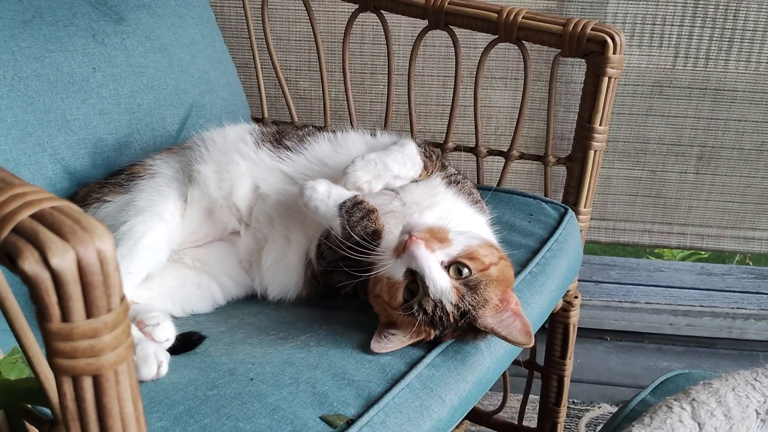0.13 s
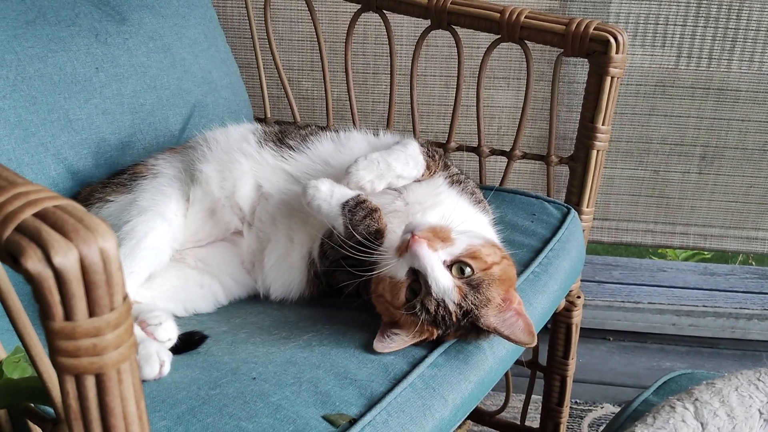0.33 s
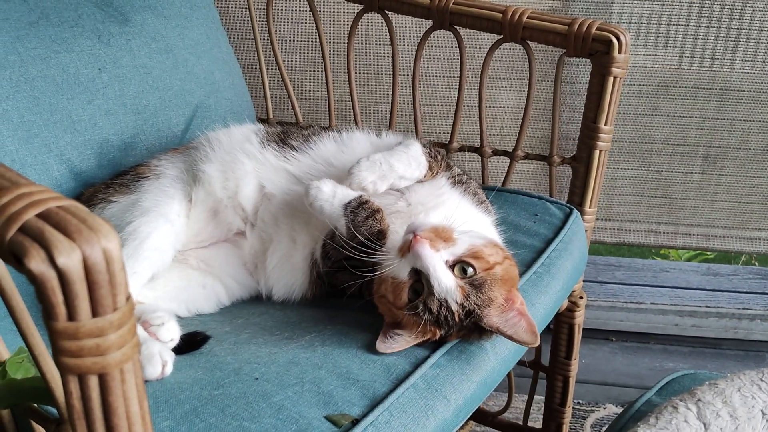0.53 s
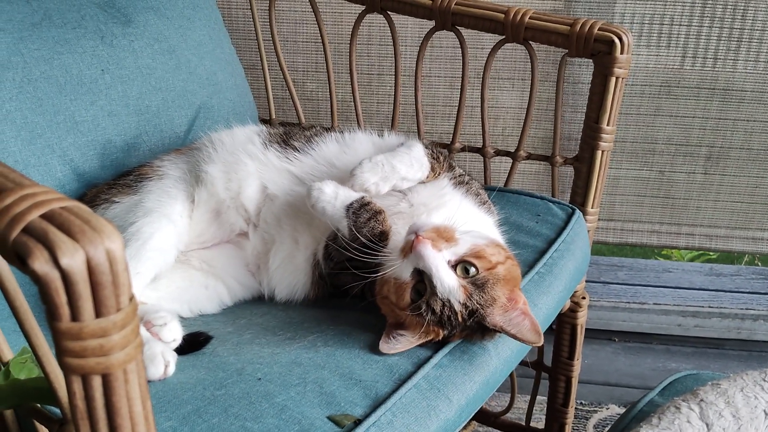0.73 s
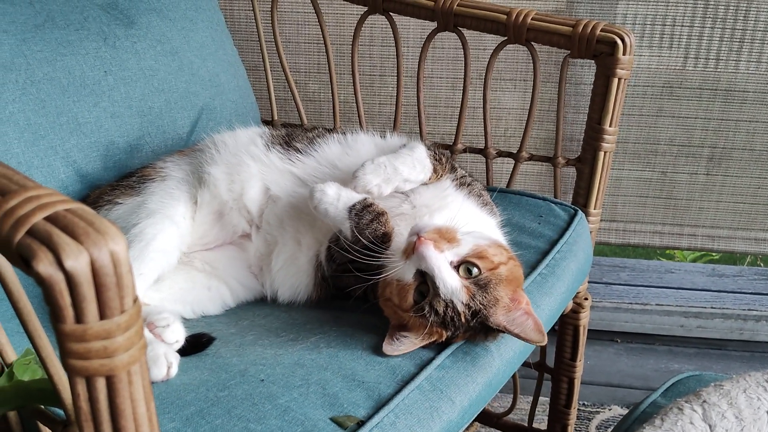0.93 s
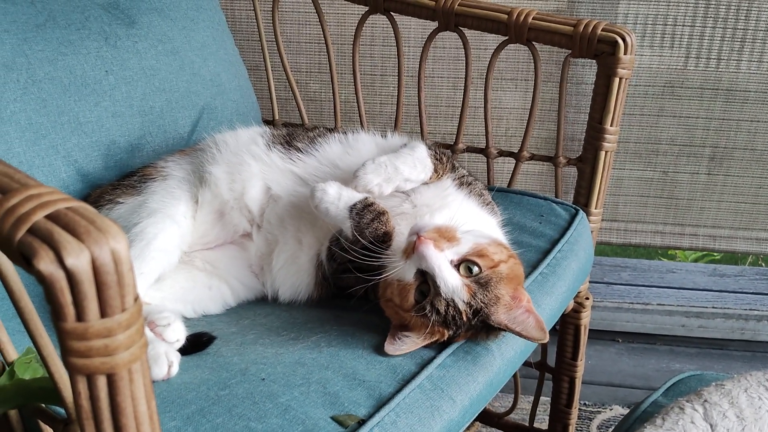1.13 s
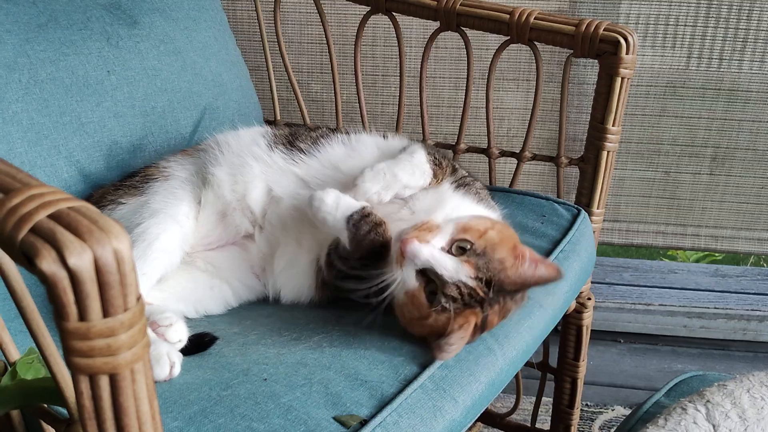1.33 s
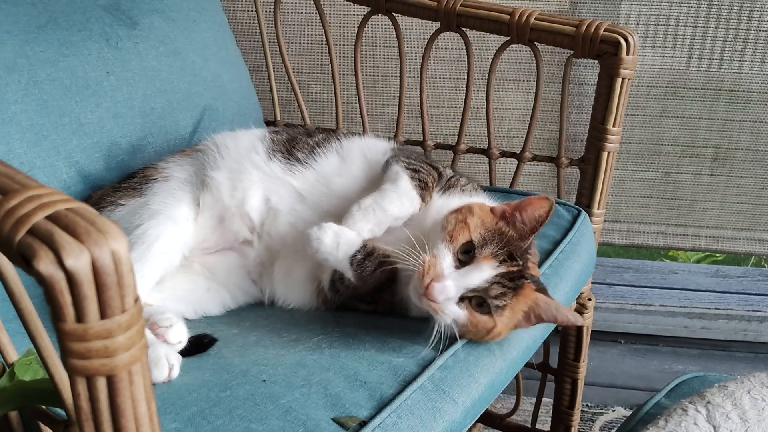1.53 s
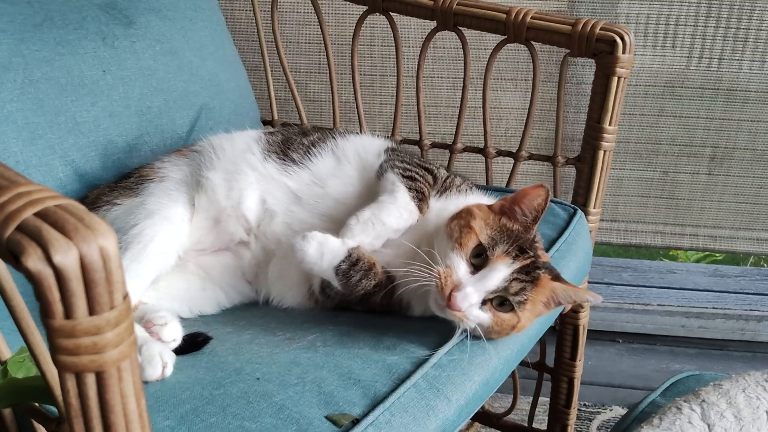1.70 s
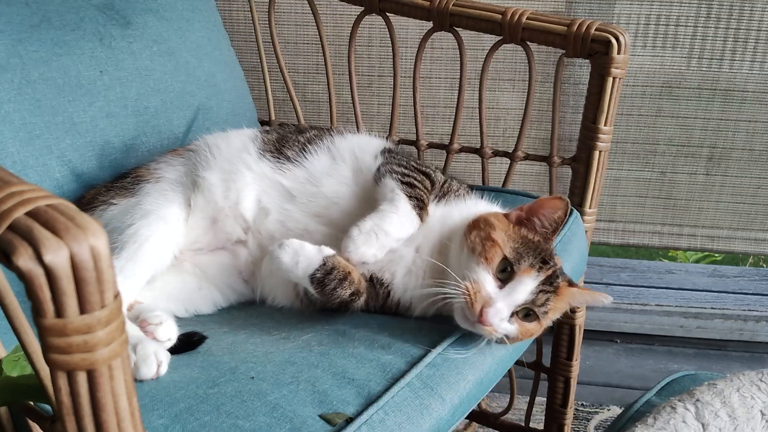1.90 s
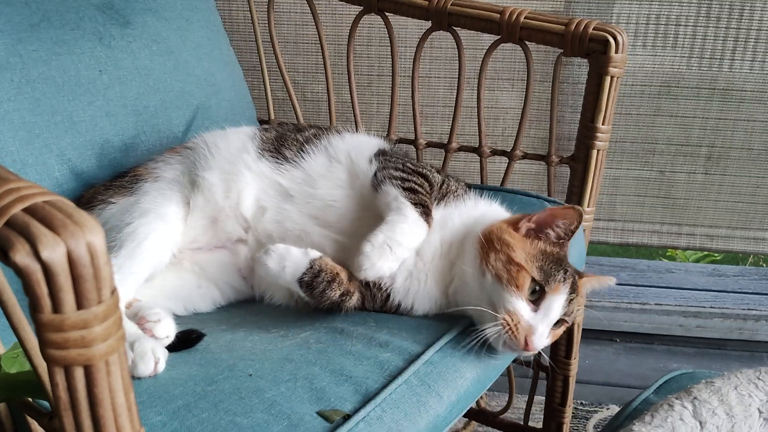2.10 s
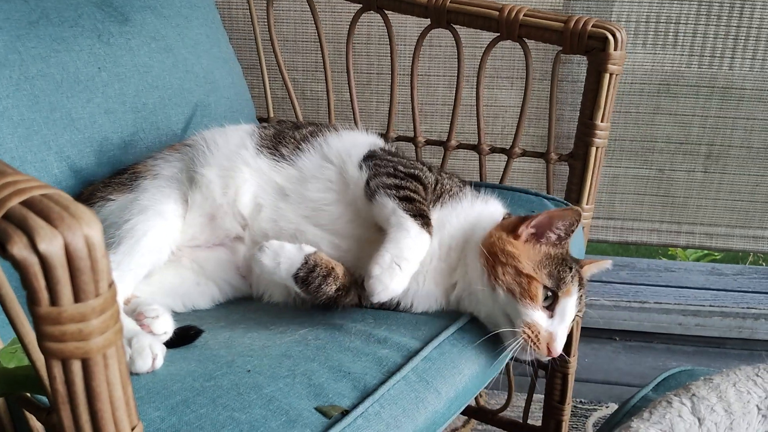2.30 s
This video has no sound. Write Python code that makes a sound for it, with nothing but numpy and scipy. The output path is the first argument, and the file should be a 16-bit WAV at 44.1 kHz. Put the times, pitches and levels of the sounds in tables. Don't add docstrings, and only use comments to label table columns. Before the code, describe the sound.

A single soft cat meow from about 0.17 to 0.95 seconds: a closed-lip hum, a bright open vowel near 0.5, then closing to a higher hum from 0.8, cut off quickly. Faint air conditioner rumble, hum and hiss run throughout, swelling during the call. A very faint insect rasp fades by 1.5. Tiny wicker ticks come at 0, 1.0 and 1.2, a soft low bump at 1.8.

```python
import sys
import numpy as np
from scipy import signal
from scipy.fft import rfft, irfft, next_fast_len
from scipy.io import wavfile
from scipy.ndimage import uniform_filter1d, map_coordinates

SR = 44100
rng = np.random.default_rng(int(sys.argv[2]) if len(sys.argv) > 2 else 0)


def attenuation_scalar(level_db):
    decades = np.asarray(level_db, float) / 20
    return 10 ** decades


def materialize(psi):
    bounded = np.clip(np.atleast_2d(psi).T, -1, 1)
    quanta = np.round(bounded * 32767).astype(np.int16)
    wavfile.write(sys.argv[1], SR, quanta)


N = 103635
LEAD_S = .0001

# t/s, level/dB
VOICE = [
    (.17, -53.5),
    (.20, -42.5),
    (.28, -33.5),
    (.39, -34),
    (.47, -36.5),
    (.75, -35.5),
    (.81, -42),
    (.87, -38),
    (.95, -38),
]


def unit(x):
    return x / np.sqrt(np.mean(x ** 2) + 1e-20)


def along(points, hz):
    f, v = np.transpose(points)
    return np.interp(np.log(hz + 1), np.log(f + 1), v)


def curves(rows):
    s, *cols = np.transpose(rows)
    t = np.arange(N) / SR
    return [uniform_filter1d(np.interp(t, s, c), size=700, mode="nearest") for c in cols]


def wobble(rate):
    return map_coordinates(rng.standard_normal(N // 50), [np.arange(N) * rate / SR])


def filtered(x, response):
    m = next_fast_len(N + SR // 2)
    return irfft(rfft(x, m) * response(np.fft.rfftfreq(m, 1 / SR)), m)[..., :N]


def peak(f, hz, width_hz):
    return (hz * width_hz) ** 2 / ((hz ** 2 - f ** 2) ** 2 + (f * width_hz) ** 2)


def rush(spectrum, patchy_db):
    # f/Hz, correlation
    alike = [(60, 0.93), (130, 1), (290, 0.87), (640, 0.75), (1410, -0.75), (3100, 0.99), (6820, -0.57),
             (15000, 0.068)]
    # f/Hz, level/dB
    balance = [(60, -2.5), (240, 2), (950, 1.5), (3770, 0.0), (15000, -1.5)]
    z = signal.stft(rng.standard_normal((2, N)), nperseg=512)[2]
    patches = uniform_filter1d(rng.standard_normal(z.shape[1:]), size=6, axis=0)
    patches = uniform_filter1d(patches, size=10, axis=1)
    pair = signal.istft(z * attenuation_scalar(patchy_db * unit(patches)), nperseg=512)[1][:, :N]

    def mid_side(hz):
        turn = np.arccos(np.clip(along(alike, hz), -1, 1)) / 2
        return attenuation_scalar(along(spectrum, hz)) * [np.cos(turn), np.sin(turn)]

    def left_right(hz):
        lead = np.exp(1j * np.pi * hz * LEAD_S * np.array([[1], [-1]]))
        return attenuation_scalar(along(balance, hz) * [[.5], [-.5]]) * lead

    mid, side = filtered(pair, mid_side)
    return unit(filtered(np.array([mid + side, mid - side]), left_right))


def noise_reducer():
    # t/s, background level/dB
    let_through = [(0, -81), (.16, -81), (.20, -76), (.30, -73.5), (.38, -72.5), (.60, -70), (.80, -71),
                   (.935, -69.5), (.965, -75.5), (1.1, -77), (1.3, -80), (2.35, -81)]
    open_db, = curves(let_through)
    return open_db - let_through[-1][1]


def rumble(open_db):
    # f/Hz, level/dB per Hz
    bass = [(30, -21), (50, -9), (118, -4), (146, -7.5), (236, -10), (356, -14), (500, -32.5)]
    bass_db, reducer_share = -62.5, 0.77
    gain = attenuation_scalar(bass_db + reducer_share * open_db + 0.41 * wobble(7.5))
    return gain * rush([(18, -58)] + bass + [(800, -54)], patchy_db=0.5)


def hum():
    # f/Hz, level/dB rms
    tones = [(105.8, -70.5), (120, -61), (225, -72), (239, -69), (297, -81), (360, -72), (628, -79.5),
             (706, -82.5), (734, -76.5), (840, -74.5), (974, -79), (1305, -79), (1637, -78), (1722, -88.5)]
    t = np.arange(N) / SR
    out = 0
    for hz, db in tones:
        gain = np.sqrt(2) * attenuation_scalar(db + 0.7 * wobble(9))
        cycles = hz * t + rng.random() + 0.074 * wobble(15)
        out = out + gain * np.sin(2 * np.pi * (cycles + hz * LEAD_S * np.array([[1], [0]])))
    return out


def fan():
    band = filtered(rng.standard_normal((2, N)), lambda f: peak(f, hz=1682, width_hz=50))
    return attenuation_scalar(-73) * unit(band)


def hiss():
    # f/Hz, level/dB per Hz
    grille = [(400, -10), (480, -6), (900, -5.5), (1700, -7), (3600, -12.5), (5500, -21.5), (9000, -26),
              (15700, -35)]
    return attenuation_scalar(-60.5 + 0.45 * wobble(14)) * rush([(200, -39.5)] + grille, patchy_db=0.76)


def ticks():
    # t/s, peak level/dB, f/Hz, t60/s
    creaks = [
        (.002, -53.5, 7420, 0.023),
        (1.005, -66, 9500, 0.005),
        (1.23, -58, 7000, .012),
        (1.784, -35, 130, 0.054),
    ]
    out, t = np.zeros(N + SR), np.arange(SR // 5) / SR
    for s, db, hz, t60 in creaks:
        onset = 1 - np.exp(-t * hz / 2)
        start = round(s * SR)
        out[start:start + len(t)] += attenuation_scalar(db - 60 * t / t60) * np.sin(2 * np.pi * hz * t) * onset
    return out[:N] * attenuation_scalar([[1.5], [-1.5]])


def fold_pitch(t):
    # t/s, f/Hz before the closing rise
    base = [(.17, 450.6), (.33, 430), (.39, 435.2), (.47, 422), (.55, 420), (.65, 425), (.75, 444),
            (.87, 444.5), (.95, 462.4)]
    rise_s, rise_span_s, rise_hz = 0.8024, .02, 167.6
    rise = rise_hz / (1 + np.exp(np.clip((rise_s - t) / rise_span_s, -50, 50)))
    return uniform_filter1d(curves(base)[0], size=1500) + rise


def through_lips(f, drop):
    # f/Hz, width/Hz, level/dB
    palate = [(2620, 700, -5), (3450, 500, 0), (5100, 300, -20), (5650, 300, -17)]
    out = sum(attenuation_scalar(2 * db) * peak(f, hz, width) ** 2 for hz, width, db in palate)
    front_shut_hz, front_wide_hz, snap = 6450, 7020, 0.59
    front_hz = front_shut_hz + np.clip(4 * (drop - snap) + .5, 0, 1) * (front_wide_hz - front_shut_hz)
    out += attenuation_scalar(2 * (-12.5 + 3.3 * drop ** 2)) * peak(f, front_hz, width_hz=600) ** 2
    throat_shut_hz, throat_wide_hz, throat_db = 4250, 3760, -5
    throat_hz = throat_shut_hz + np.sqrt(drop) * (throat_wide_hz - throat_shut_hz)
    return out + attenuation_scalar(2 * throat_db) * peak(f, throat_hz, width_hz=500) ** 2


def mouth_power(k, f, t, jaw, tongue, tongue_db, lips_db):
    folds_db_per_oct = -4.5
    throat = peak(f, jaw, width_hz=280) * attenuation_scalar(2 * folds_db_per_oct * np.log2(k))
    drop = np.clip((jaw - jaw.min()) / np.ptp(jaw), 0, 1)
    mouth = attenuation_scalar(2 * tongue_db) * peak(f, tongue, width_hz=320) ** 2
    mouth += attenuation_scalar(2 * lips_db) * through_lips(f, drop)
    nose_hz, nose_width_hz, nose_db, nose_fade_s = 1250, 510, 0, 0.035
    nose_fade = np.exp(-2 * np.abs(t - VOICE[0][0]) / nose_fade_s)
    mouth += attenuation_scalar(2 * nose_db) * peak(f, nose_hz, nose_width_hz) ** 2 * nose_fade
    power = throat / throat[0] + (k > 1) * mouth
    shut_db, wide_db = -9, -0.5
    hollow_db = (shut_db + drop ** 2 * (wide_db - shut_db)) * peak(f, hz=1455, width_hz=410)
    return power * attenuation_scalar(2 * hollow_db * (k > 1))


def breath(lips_db):
    air = unit(filtered(rng.standard_normal(N), lambda f: peak(f, hz=3600, width_hz=1400)))
    return air * attenuation_scalar(-59 + .65 * lips_db)


def catches(k, t):
    # t/s, length/s, fundamental level/dB, overtone level/dB
    dips = [
        (0.335, 0.038, -1.5, -5),
        (0.711, .012, -3, -7.5),
    ]
    gain_db = .7 * np.array([wobble(16.37) for _ in k])
    for s, span, low_db, high_db in dips:
        gain_db += np.where(k > 1, high_db, low_db) * np.exp(-((t - s) / span) ** 2)
    return gain_db


def cat():
    # t/s, jaw resonance f/Hz, tongue resonance f/Hz, tongue level/dB, lip opening level/dB
    mouth_shape = [
        (.25, 440, 3100, -40, -32),
        (.29, 418, 2940, -14.5, -25),
        (.38, 450, 3020, -13, -17),
        (.44, 648, 2315, -6, -12),
        (.52, 785, 2150, 2.5, -9.5),
        (.605, 800, 1960, -5.5, -14.5),
        (.65, 739.4, 1750, -7.5, -37),
        (.76, 864, 1505, -7.5, -27),
        (.89, 583, 1113, -11, -34),
    ]
    attack_s, release_s, jitter, shimmer_db = 0.035, 0.029, .001, .4
    t = np.arange(N) / SR
    level_db, = curves(VOICE)
    jaw, tongue, tongue_db, lips_db = curves(mouth_shape)
    pitch = fold_pitch(t)
    k = np.arange(1, 20)[:, None]
    power = mouth_power(k, k * pitch, t, jaw, tongue, tongue_db, lips_db)
    cycles = np.cumsum(pitch * (1 + jitter * wobble(119.7))) / SR
    waves = np.sin(2 * np.pi * (k * cycles + rng.random(k.shape)))
    tones = np.sqrt(2 * power) * attenuation_scalar(catches(k, t)) * waves
    gate = np.clip((t - VOICE[0][0]) / attack_s + .5, 0, 1)
    gate = gate * np.clip((VOICE[-1][0] - t) / release_s + .5, 0, 1)
    voice = tones.sum(0) * attenuation_scalar(level_db + shimmer_db * wobble(60.05))
    return (voice + breath(lips_db)) * gate


def ports(x):
    # f/Hz, level/dB
    pan = [(430, 1.5), (850, 4.5), (1280, -2.5), (1900, -14.5), (2550, 5.5), (3100, -3), (4400, -5),
           (7000, 21)]
    # f/Hz, phase/radians
    lead = [(430, 0.33), (850, 0.55), (1280, 0.43), (1900, 1.3), (2550, 2), (3400, 0.87), (3900, 3.5),
            (7000, 4)]
    echo_db, echo_t60 = -17.5, 0.23

    def pair(hz):
        shadow_db = -9 * peak(hz, 3810, width_hz=730) ** 2
        ratio = attenuation_scalar(along(pan, hz) + shadow_db)
        turn = np.exp(.5j * along(lead, hz))
        return np.array([ratio * turn, 1 / turn]) * np.sqrt(2 / (1 + ratio ** 2))

    t = np.arange(SR // 4) / SR
    tail = rng.standard_normal((2, len(t))) * attenuation_scalar(-60 * t / echo_t60)
    echo = signal.fftconvolve(x[None], tail / np.linalg.norm(tail[0]), axes=1)[:, :N]
    return filtered(x, pair) + attenuation_scalar(echo_db) * echo


def insect():
    # t/s, strength level/dB, upper band f/Hz
    rasp = [
        (.3, -30, 11200),
        (.40, 0, 11250),
        (.52, -1, 11950),
        (.75, -3, 12000),
        (.9, -2, 12000),
        (1.15, 2, 11800),
        (1.22, -1, 11800),
        (1.29, -12, 11800),
        (1.55, -20, 11800),
    ]
    high_db, low_db = -82.5, -81.5
    strength_db, upper_hz = curves(rasp)
    slow = filtered(rng.standard_normal((2, 2, N)), lambda f: peak(f + 1, 230, 380) * (f < 1200))
    phase = 2 * np.pi * np.cumsum(upper_hz) / SR
    high = unit(slow[0] * np.cos(phase) + slow[1] * np.sin(phase))
    low = unit(filtered(rng.standard_normal((2, N)), lambda f: peak(f, hz=7000, width_hz=770)))
    low = low * attenuation_scalar([[3], [-6]])
    return attenuation_scalar(strength_db + 1.5 * wobble(45)) * (attenuation_scalar(high_db) * high + attenuation_scalar(low_db) * low)


def scene():
    open_db = noise_reducer()
    background = rumble(open_db) + attenuation_scalar(.45 * open_db) * hum()
    background = background + attenuation_scalar(open_db) * (hiss() + fan() + insect())
    return background + ticks() + ports(cat())


def low_pass(x):
    return signal.sosfilt(signal.butter(12, 15690, fs=SR, output="sos"), x)


def record(dry):
    return low_pass(dry)


dry = scene()
out = record(dry)
materialize(out)
```